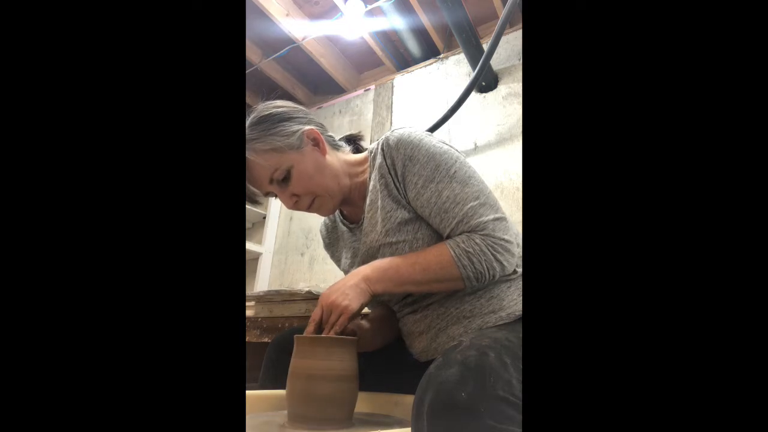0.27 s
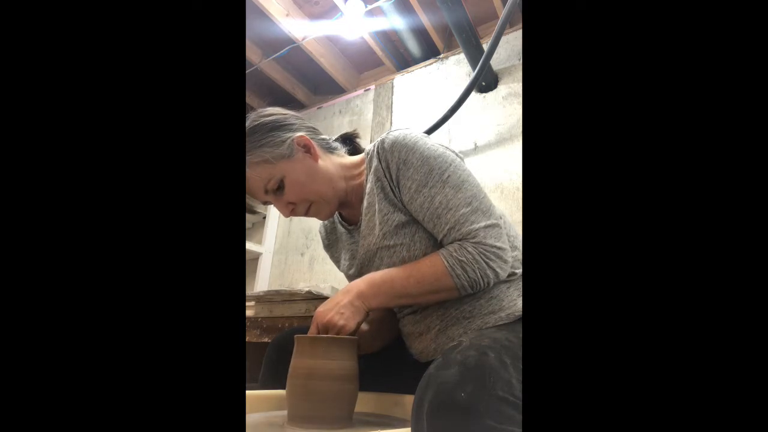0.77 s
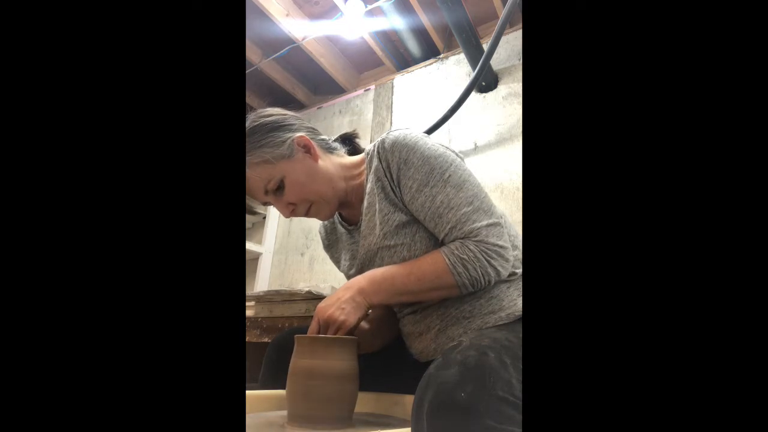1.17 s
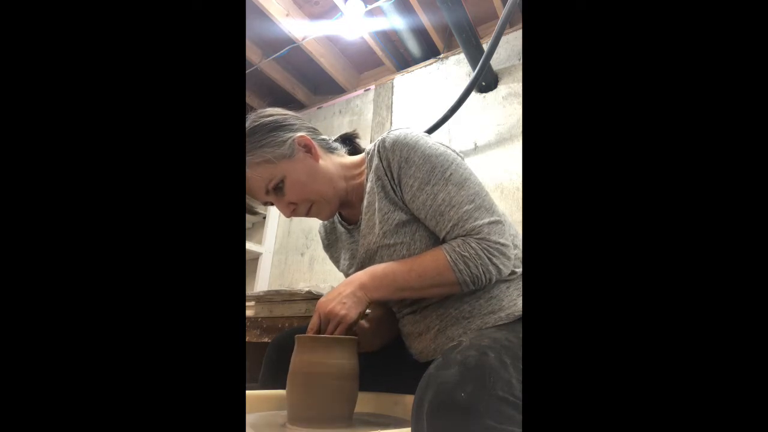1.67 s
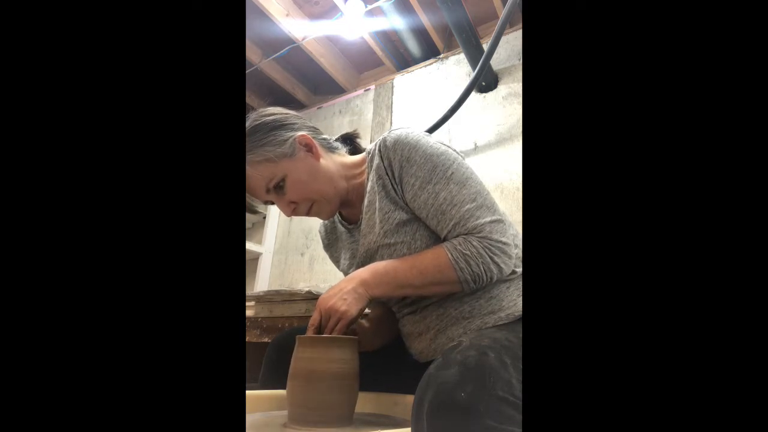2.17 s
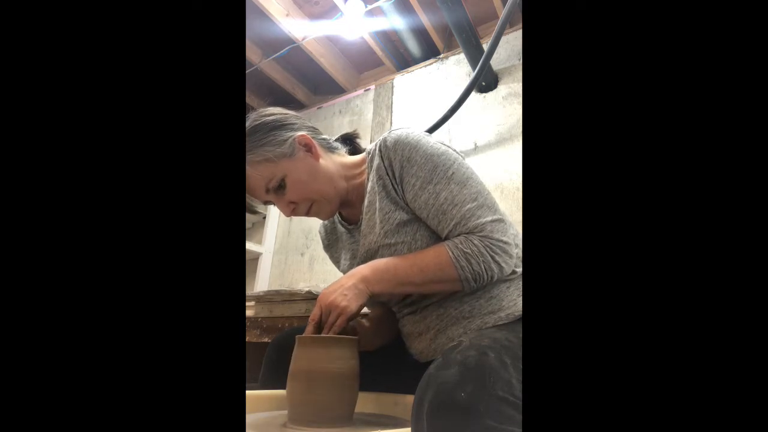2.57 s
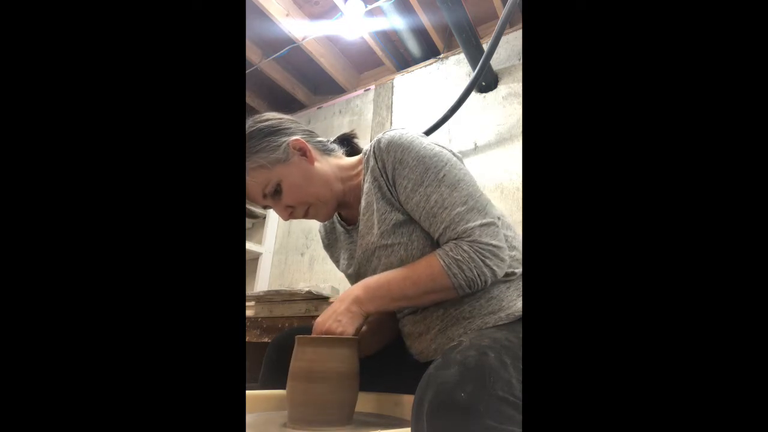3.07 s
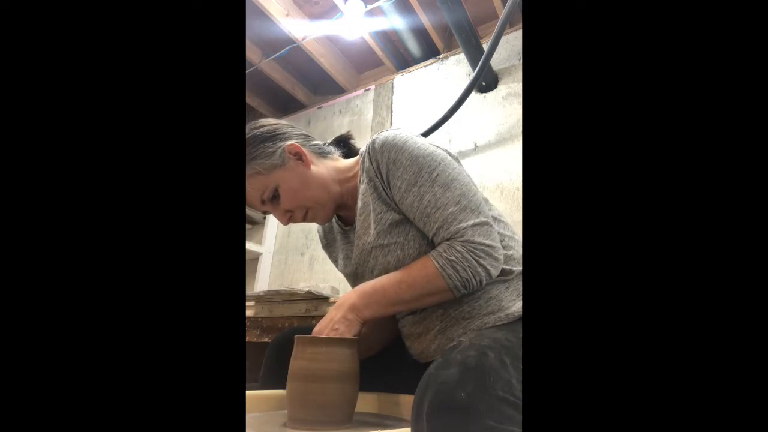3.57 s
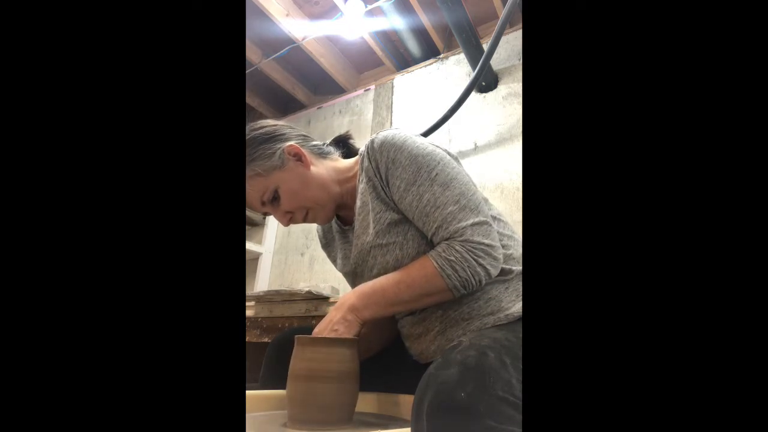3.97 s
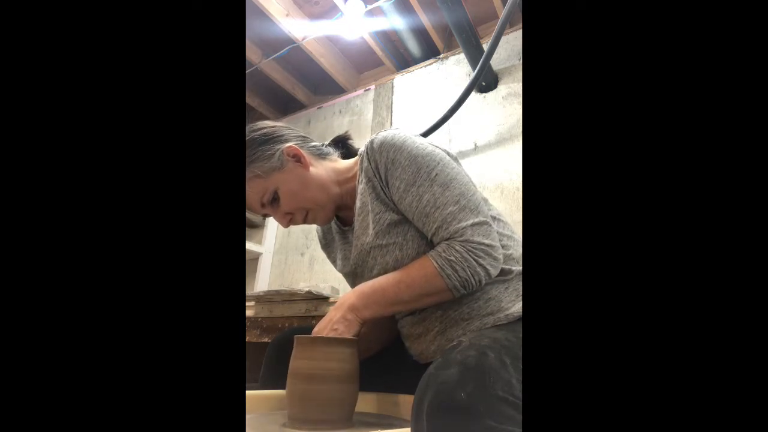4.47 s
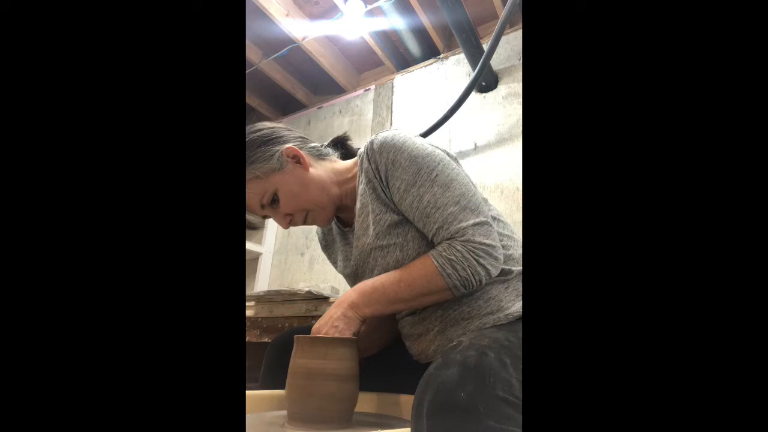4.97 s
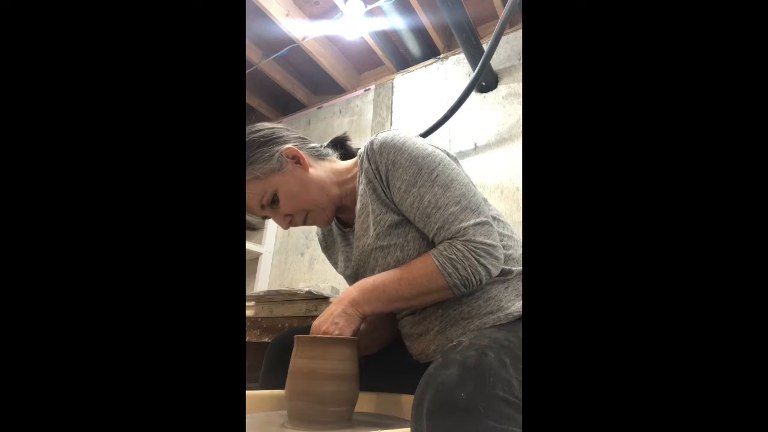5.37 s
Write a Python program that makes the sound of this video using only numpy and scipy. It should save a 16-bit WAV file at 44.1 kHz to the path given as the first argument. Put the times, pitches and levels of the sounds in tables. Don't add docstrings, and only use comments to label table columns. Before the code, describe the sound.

Close, dry mono capture of an electric pottery wheel already running and never stopping. Deep steady buzz from the motor, frame rattling in a fast regular pattern, hollow midrange ringing, a light whir and faint airy hiss. Barely audible very high chirps come a little over twice a second; a single small gritty tick occurs before two seconds. The potter works silently.

```python
import sys
import numpy as np
from scipy import signal
from scipy.fft import rfft, irfft, next_fast_len
from scipy.io import wavfile

SR = 44100
rng = np.random.default_rng(int(sys.argv[2]) if len(sys.argv) > 2 else 0)


def to_linear_factor(level_db):
    exponent = np.asarray(level_db, float) / 20
    return 10 ** exponent


def file_out(sig):
    cols = np.atleast_2d(sig).T
    lim = np.clip(cols, -1, 1)
    pcm = np.round(lim * 32767).astype(np.int16)
    wavfile.write(sys.argv[1], SR, pcm)


N = 248283

SHAFT_HZ = 10.3224


def at_hz(points, hz):
    points = np.array(points)
    return np.interp(np.log(hz), np.log(points[:, 0]), points[:, 1])


def drift(rate):
    hop = 100
    pole = np.exp(-2 * np.pi * rate * hop / SR)
    coarse = rng.standard_normal(N // hop + 2002)
    slow = signal.lfilter([1], [1, -2 * pole, pole * pole], coarse)[2000:]
    return np.interp(np.arange(N) / hop, np.arange(len(slow)), slow / slow.std())


def random_phases(shape):
    return np.exp(2j * np.pi * rng.random(shape))


def shaft_turns():
    lag_at_s, lead_bend, lag_ms = 3.1, .08, .22
    shake_us = 12
    t = np.arange(N) / SR
    lead_ms = lead_bend * (t - lag_at_s) ** 2 - lag_ms
    return SHAFT_HZ * (t + lead_ms / 1000 + shake_us * 1e-6 * drift(3))


def whir(turns, throb_db):
    # (frequency [Hz], level [dB per Hz])
    rubbing = [(30, -95.5), (42, -92.5), (55, -73.5), (100, -77.5), (200, -79), (300, -79), (600, -80),
               (800, -84.5), (1150, -86), (1330, -78), (1480, -89.5), (2300, -96), (3500, -103),
               (4200, -101), (4350, -107)]
    # (frequency [Hz], level [dB per Hz])
    hiss = [(3500, -125), (4400, -108), (5300, -107), (5700, -109), (7000, -113), (7900, -113),
            (8250, -118), (11000, -121), (15500, -126)]
    # (centre [Hz], width [Hz], power added at the centre against the rest [dB])
    panels = [(124.7, 9, 13), (146, 69, 4), (171.2, 16.4, 15), (375, 13, -3), (404, 20, -16), (504, 11, -9),
              (600, 25, 3), (1096, 87, 7.5), (1195, 17, 3.5), (1720, 48, 4.5), (2410, 44, 7.5),
              (2760, 92, 6), (3096, 210, 7), (3803, 96, 8), (3940, 54, 5.5), (4640, 91, -4.5),
              (5200, 150, -4.5), (7850, 49, 5)]
    size = next_fast_len(N)
    hz = np.maximum(np.arange(size // 2 + 1) * SR / size, 1)
    lift = 1
    for centre, width, db in panels:
        lift = lift + to_linear_factor(2 * db) / (1 + (2 * (hz - centre) / width) ** 2) ** 2
    low_shape = to_linear_factor(at_hz(rubbing, hz)) / (1 + (hz / 4600) ** 30) * np.sqrt(lift)
    high_shape = to_linear_factor(at_hz(hiss, hz)) * np.sqrt(lift)
    spectra = rfft(rng.standard_normal((2, size))) * [low_shape, high_shape]
    low, high = irfft(spectra, size)[:, :N]
    throb = sum(np.cos(2 * np.pi * k * (turns - 0.72)) for k in (4, 12))
    return np.sqrt(SR / 2) * (low + high * to_linear_factor(throb_db * throb))


def squeaks():
    first_s, gap_s, length_s, squeak_hz = .473, .4233, .014, 14900
    squeak_levels = [-87, -90, -86, -95, -84, -90, -97, -84, -88, -97, -86, -85, -87]
    t, out = np.arange(N) / SR, np.zeros(N)
    for k, db in enumerate(squeak_levels):
        s = first_s + gap_s * k
        near = slice(int((s - .04) * SR), int((s + .04) * SR))
        swell = np.exp(-(2 * (t[near] - s) / length_s) ** 4)
        out[near] += to_linear_factor(db) * swell * np.sin(2 * np.pi * squeak_hz * t[near])
    return out


def grit_ticks():
    # (time [s], peak level [dB])
    ticks = [
        (1.738, -70),
    ]
    out = np.zeros(N)
    for s, db in ticks:
        at = round(s * SR)
        grit = signal.lfilter([.4], [1, -.6], rng.standard_normal(600))
        out[at:at + 600] += to_linear_factor(db) * grit * np.exp(-np.arange(600) / 150.0)
    return out


def bearings(flutter_db):
    # (frequency [Hz], level [dB rms], wander [Hz])
    thin_tones = [(41.29, -73, .02), (53.02, -60, .05), (85.57, -69, .1), (149.73, -54, .05),
                  (349.69, -69, .1), (570.47, -70, .1), (591.83, -67, .1), (603.15, -70, .1),
                  (920.74, -72, .3), (1039.56, -70, .3), (1159.59, -68, .2), (1157.15, -74, .2),
                  (1366.3, -72, .3), (1426.9, -74, .3), (1436.3, -75, .3), (2413, -81, 1.0), (3800, -86, 2),
                  (4077, -87, 1.5), (4212, -87, 1), (4470, -91, 2), (4531, -90, 1.5), (4920, -93, 2),
                  (5227.7, -80, 1.2), (5238, -93, 1), (5822, -94, 1.5), (5905, -97, 3), (6090, -95, 1.5),
                  (6535, -98, 2), (6654, -98, 1.5), (7440, -101, 2)]
    out = 0
    for hz, db, wander in thin_tones:
        phase = np.cumsum(hz + wander * drift(0.764)) / SR + rng.random()
        out = out + np.sqrt(2) * to_linear_factor(db + flutter_db * drift(3.9)) * np.sin(2 * np.pi * phase)
    return out


def motor_hum(turns, flutter_db):
    # (hum multiple, added shaft multiple, level [dB rms])
    hum_tones = [
        (1, 0, -38.3),
        (2, 0, -63),
        (3, 0, -74),
        (5, 0, -68),
        (1, 2, -55),
        (1, 3, -59),
        (1, 4, -60),
    ]
    hum_turns = 120.03 * np.arange(N) / SR
    out = 0
    for k, m, db in hum_tones:
        start = (m > 0) * rng.random()
        out = out + to_linear_factor(db) * np.cos(2 * np.pi * (k * hum_turns + m * turns + start))
    return np.sqrt(2) * to_linear_factor(flutter_db * drift(1.6)) * out


def looped(harmonics, turns):
    size = 8192
    cycle = irfft(np.append(0, harmonics), size) * size / np.sqrt(2)
    return np.interp(turns % 1 * size, np.arange(size + 1), np.append(cycle, cycle[0]))


def knock_swell(knocks, length, rest_db):
    share = np.arange(128) / 128
    swell = to_linear_factor(rest_db)
    for at, db in knocks:
        away = (share - at + .5) % 1 - .5
        swell = swell + to_linear_factor(db) * np.exp(-(2 * away / length) ** 2)
    return swell / np.linalg.norm(swell)


def knocked(level, hz, parts, rest_db):
    masks = np.array([(hz >= low) & (hz < high) for (low, high, _), _ in parts])
    swells = np.array([knock_swell(knocks, length, rest_db) for (_, _, length), knocks in parts])
    draws = level * random_phases((128, 1, len(level)))
    for _ in range(36):
        rough = np.fft.ifft(draws * masks, 128)
        shaped = np.fft.fft(swells * rough / np.abs(rough))[..., :len(level)]
        draws = level * np.exp(1j * np.angle((shaped * masks).sum(axis=1, keepdims=True)))
    fit = (np.abs(rough) * swells).sum(axis=2) / np.linalg.norm(rough, axis=2)
    return draws[np.argmax(fit.sum(axis=1)), 0]


def shaft(turns, wobble_db, belt_db):
    # (frequency [Hz], typical level [dB rms])
    weak_curve = [(40, -90.5), (300, -74.5), (850, -71.5), (950, -75), (1450, -79), (1750, -81),
                  (2100, -97.5), (2600, -97.5), (2800, -88), (3300, -83), (3550, -100), (4150, -89.5),
                  (4400, -100), (5500, -102), (6600, -108)]
    # (centre [Hz], width [Hz], top level [dB rms])
    body_modes = [(129.1, 14, -56.7), (151.9, 9, -48.2), (180.6, 27, -47.9), (233.0, 58, -56.0),
                  (263.9, 22, -58.6), (314.9, 18, -53.8), (356.5, 12, -51.4), (368.4, 9, -46.8),
                  (406.5, 33, -49.0), (448.9, 13, -56.0), (481.6, 21, -46.7), (521.3, 19, -50.5),
                  (544.8, 40, -55.9), (583.6, 13, -53.2),
                  (616.3, 26, -62.7), (646.9, 21, -64.7), (687.4, 11, -62.6), (741.1, 67, -67.8),
                   (848.0, 19, -66.9), (1036.9, 12, -62.9), (1077.7, 12, -55.9), (1113.6, 33, -63.2),
                   (1156.2, 9, -70.7), (1200.0, 23, -55.2), (1235.0, 10, -57.9), (1265.7, 11, -55.0),
                   (1304.7, 11, -60.8), (1326.0, 12, -65.9),
                  (2740, 120, -82),
        (3020, 120, -82),
        (3135, 25, -79),
        (3250, 15, -77),
    ]
    # ((lowest [Hz], highest [Hz], length [turns]), [(place [turns], level [dB])])
    frame_knocks = [
        ((120, 170, .2), [(.32, -5), (.62, 0), (.97, -2)]),
        ((170, 285, .1), [(.08, -1), (.22, 0), (.34, -5), (.53, -4), (.75, 0), (.92, 0)]),
        ((285, 340, .25), [(.32, -4), (.52, -3), (.77, 0)]),
        ((340, 440, .14), [(.19, -10), (.37, 0), (.56, -5), (.71, -9), (.94, 0)]),
        ((440, 560, .14), [(.02, -9), (.15, 0), (.67, -1), (.89, -2)]),
        ((560, 700, .085), [(.06, -4), (.17, -2), (.33, 0), (.48, -5), (.62, -4), (.81, -8), (.96, -5)]),
    ]
    # ((lowest [Hz], highest [Hz], length [turns]), [(place [turns], level [dB])])
    shared_knocks = [
        ((140, 230, .15), [(.25, -3), (.51, -3), (.67, -5), (.81, -7), (.96, 0)]),
        ((380, 500, .1), [(.1, -3), (.2, -9), (.31, -4), (.44, -5), (.56, -3), (.71, -2), (.84, 0), (.97, 0)]),
        ((500, 640, .09), [(.04, -8), (.17, 0), (.24, -3), (.36, -8), (.62, -4), (.73, -5), (.83, -4), (.93, -6)]),
    ]
    # ((lowest [Hz], highest [Hz], length [turns]), [(place [turns], level [dB])])
    shell_knocks = [
        ((1140, 1390, .09), [(.01, -10), (.19, -4), (.31, -9), (.45, -7), (.56, 0), (.69, -5), (.77, -4), (.87, -1)]),
        ((995, 1140, .12), [(.08, -6), (.36, -4), (.48, -8), (.65, 0), (.77, -5), (.93, -5)]),
    ]
    pulse_levels = [-6, -10, -8, -8, 0, 0, -3, -3, -8]
    pulse_band = (995, 1390, .06)
    first_pulse, pulse_gap = .19, .097

    hz = SHAFT_HZ * np.arange(1, 640)
    power = 0
    for centre, width, db in body_modes:
        power = power + to_linear_factor(2 * db) / (1 + (2 * (hz - centre) / width) ** 2) ** 3
    weak = to_linear_factor(at_hz(weak_curve, hz)) * rng.rayleigh(np.sqrt(.5), len(hz))
    level = np.maximum(np.sqrt(power), weak)
    pattern = level * random_phases(len(hz))

    pulses = [(first_pulse + pulse_gap * k, db) for k, db in enumerate(pulse_levels)]
    low_parts = frame_knocks[:3] + shared_knocks[:1]
    mid_parts = frame_knocks[3:] + shared_knocks[1:]
    shell_parts = shell_knocks + [(pulse_band, pulses)]
    for parts in low_parts, mid_parts, shell_parts:
        lowest = min(part[0][0] for part in parts)
        highest = max(part[0][1] for part in parts)
        band = (hz >= lowest) & (hz < highest)
        pattern[band] = knocked(level[band], hz[band], parts, rest_db=-19)
    out = looped(pattern, turns)

    belt = 2 * np.pi * 1.19 * np.arange(N) / SR
    load_changes = [to_linear_factor(wobble_db) * drift(0.81), to_linear_factor(wobble_db) * drift(0.89)]
    belt_changes = [to_linear_factor(belt_db) * np.sin(belt), to_linear_factor(belt_db) * np.cos(2 * belt)]
    for change in load_changes + belt_changes:
        out = out + change * looped(level * random_phases(len(hz)), turns)
    return out


def scene():
    turns = shaft_turns()
    noises = whir(turns, throb_db=1.16) + squeaks() + grit_ticks()
    motor = bearings(flutter_db=.8) + motor_hum(turns, flutter_db=.3)
    wheel = shaft(turns, wobble_db=-23, belt_db=-20)
    return (noises + motor + wheel)[None]


def top_cut(x):
    return signal.sosfilt(signal.butter(12, 15740, fs=SR, output="sos"), x)


def record(dry):
    return top_cut(dry)


dry = scene()
out = record(dry)
file_out(out)
```